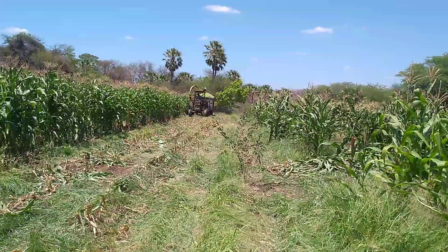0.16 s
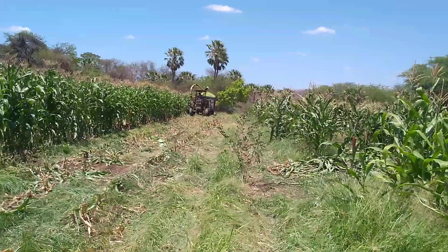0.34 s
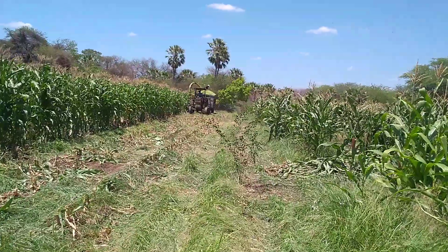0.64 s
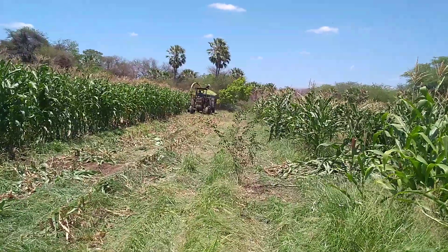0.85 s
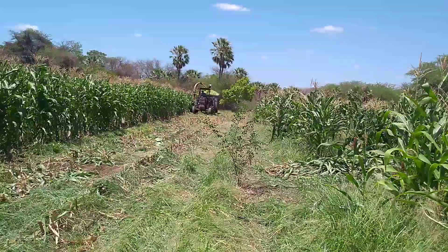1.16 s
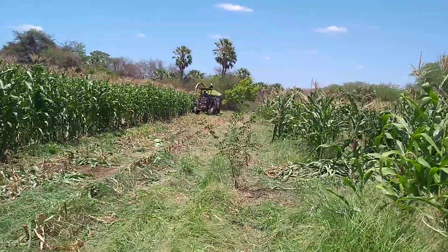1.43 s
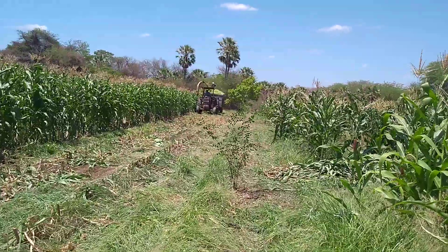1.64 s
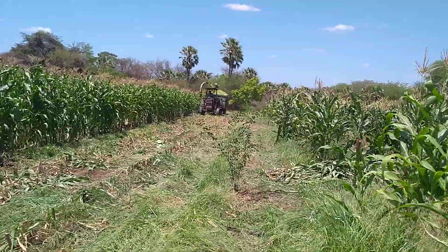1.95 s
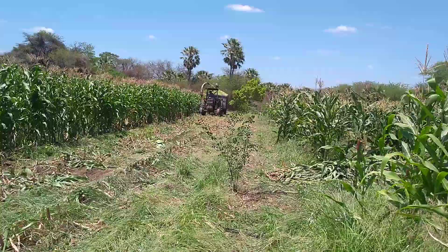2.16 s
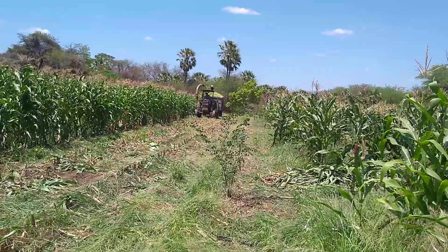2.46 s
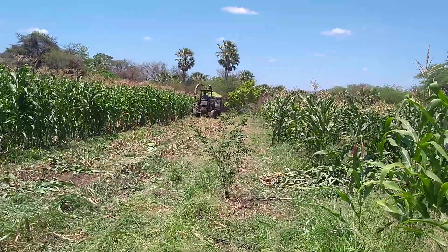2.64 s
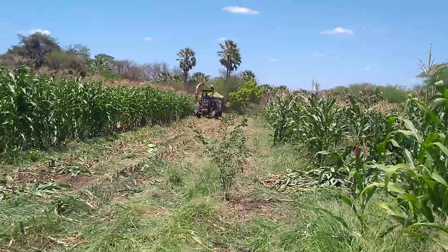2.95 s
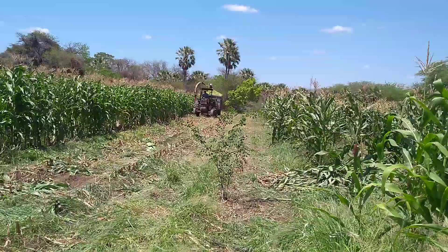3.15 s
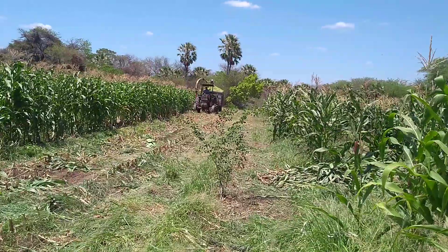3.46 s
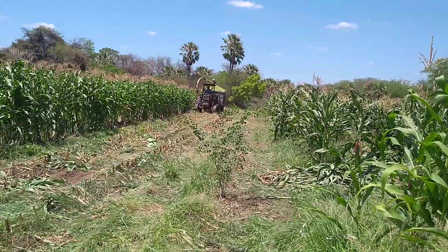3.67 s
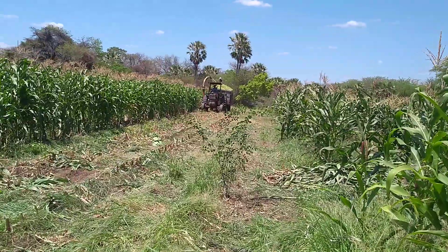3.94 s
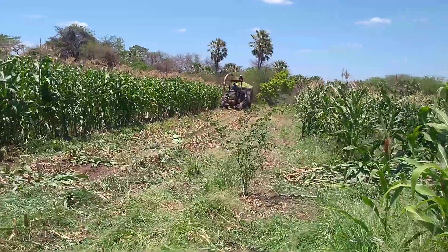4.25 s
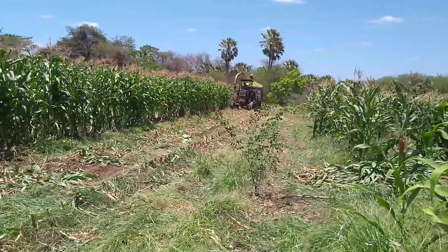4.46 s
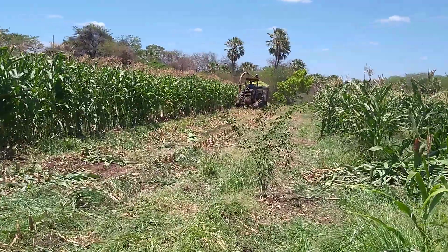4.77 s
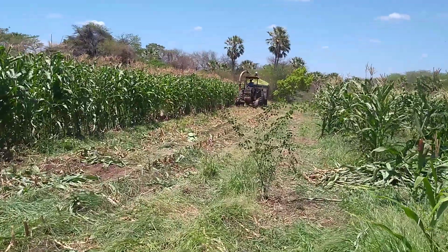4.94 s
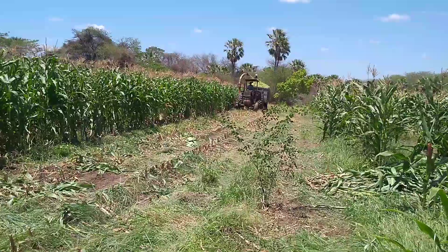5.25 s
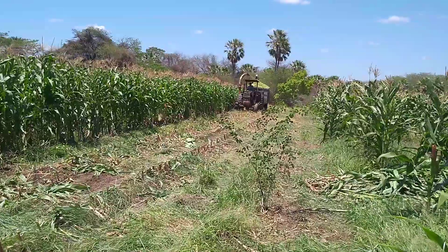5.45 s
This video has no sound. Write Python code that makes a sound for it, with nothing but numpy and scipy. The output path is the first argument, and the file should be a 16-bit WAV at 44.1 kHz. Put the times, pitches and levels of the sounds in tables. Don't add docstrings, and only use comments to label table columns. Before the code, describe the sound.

A tractor hauls a forage harvester through maize.

```python
import sys
import numpy as np
from scipy import signal
from scipy.fft import rfft, irfft, next_fast_len
from scipy.io import wavfile
from scipy.ndimage import uniform_filter1d

SR = 44100
rng = np.random.default_rng(int(sys.argv[2]) if len(sys.argv) > 2 else 0)


def to_wav(s):
    ch = np.atleast_2d(s).T
    pcm = np.round(np.clip(ch, -1, 1) * 32767)
    wavfile.write(sys.argv[1], SR, pcm.astype(np.int16))


def linear_from_db(decibels):
    return 10 ** (np.asarray(decibels, float) / 20)


N = 246959

# t/s, firing rate/Hz
FIRING_RATE = [(0.0, 65.28), (0.8, 63.71), (1.2, 65.98), (1.6, 65.74), (2.0, 64.72), (2.4, 65.5),
               (2.8, 65.77), (3.2, 66.29), (3.6, 66.39), (4.0, 66.45), (4.4, 67.36), (4.8, 68.26),
               (5.2, 68.91), (5.6, 69.63)]
# knock level/dB, lateness/ms, valve level/dB
CYLINDER_SPREAD = [(0, 0, 1), (-4, 2.5, -3), (-4, 0, 1.5), (2, 0, 1.5)]
# t/s, extra level/dB
HARD_FIRINGS = [
    (.708, 4.5),
    (1.066, 11),
    (2.257, 4),
    (2.501, 3),
    (4.011, 2.5),
    (5.076, 3),
    (5.5, 6),
]
# multiple of firing rate, level/dB
EXHAUST_LINES = [(1.0, 0.5), (1.25, -26), (1.5, -24.0), (1.75, -13), (2.0, -2.5), (2.25, -7.5), (2.5, -32),
                 (2.75, -20), (3.0, -6), (3.25, -12), (3.75, -8.5), (4.25, -15), (4.5, -36), (4.75, -43),
                 (5.0, -17), (5.25, -19.5), (5.75, -19.5), (6.0, -15.5), (6.25, -47), (6.75, -17),
                 (7.0, -24), (7.75, -48)]
# multiple of knife rate, level re hum/dB
KNIFE_LINES = [(1, 0.5), (2, -16.5), (4, -33.5), (1.398, -38), (2.514, -18)]
# t/s, level/dB
CROP_BITE = [(0, -17), (.8, -14), (1.4, -7), (2.6, -5), (3.2, -1.5), (4.0, -3.5), (4.8, 0.5), (5.6, 1.5)]
# f/Hz, level/dB
ROAR_SPECTRUM = [(30, -25), (60, -11), (100, -20), (140, 5), (250, 1), (400, -6.5), (520, -6), (700, -48)]
# f/Hz, level/dB
KNOCK_SPECTRUM = [(350, -41.5), (500, 1), (800, -2), (1200, -4.5), (1500, -13), (1900, -17.5), (2600, -54)]
# f/Hz, width/Hz, level/dB
BLOCK_MODES = [(630, 43, 2.5), (732, 82, 8.5), (814.4, 10, -5), (1114, 18, -11.5), (1240, 51, -8)]
# f/Hz, level/dB
CLATTER_SPECTRUM = [(900, -7), (1400, 11), (1900, 9), (2300, 4.5), (3300, 1), (4600, -3.5), (5500, -10.5),
                    (8000, -15.5), (11000, -17.5), (14200, -19)]
# f/Hz, level/dB
LEAF_SPECTRUM = [(2500, -37), (4500, -7.5), (6000, -1), (9000, -4.5), (12000, -8.5), (13400, -11),
                 (14200, -6.5)]
# t/s, first notch f/Hz
GROUND_NOTCH = [(0, 656), (1, 696), (2, 606), (2.8, 630), (3.3, 562), (4, 520), (4.6, 525), (5.1, 582),
                (5.6, 554)]
# multiple of first notch f, level/dB
BOUNCE_SHAPE = [(.6, 6.5), (1, -6), (1.3, 6), (2, 4), (2.3, -8), (2.7, -3.5), (3.6, -4), (5, -2)]
# t/s, level/dB
NEARNESS = [(0, -6), (.65, -5), (1.04, -7.5), (1.5, -4), (1.85, -2), (2.23, -2.5), (2.6, 0), (3.0, 1),
            (3.35, .8), (3.7, -0.7), (4.15, -1.5), (4.6, -0.6), (5.0, 0), (5.6, -.5)]
# f/Hz, level/dB
WIND_SPECTRUM = [(15, -27), (40, -3.5), (90, 2.5), (200, -1.5), (400, -16), (800, -45), (1500, -100)]
# peak t/s, peak level/dB, length/s
WIND_GUSTS = [
    (0.047, -45, 0.045),
    (0.172, -34, 0.097),
    (0.336, -39, 0.074),
    (0.704, -29.5, 0.08),
    (0.833, -37, 0.032),
    (1.145, -40, 0.39),
    (2.694, -50, 0.1),
    (3.015, -38, 0.05),
]
# t/s, thud level/dB, thud f/Hz, snap level/dB, way (-1 in, 1 out)
CASE_TICKS = [(.0578, -28, 280, -40, 1), (.0598, -26, 480, -50, -1), (.063, -21, 230, -25, -1),
              (.0665, -27, 420, -50, -1), (.0703, -12, 360, -30, -1), (.178, -24, 160, -70, 1),
              (.678, -27, 110, -70, 1), (.7275, -19.5, 220, -33, 1), (2.4062, -30, 500, -25, -1),
              (2.4619, -18, 300, -17.5, -1), (2.946, -32, 300, -33, -1), (2.977, -26, 250, -32, -1),
              (5.5315, -20, 220, -36, -1)]
# f/Hz, share fed across
CROSS_FEED = [(2200, 0.81), (4600, 0.63), (7000, 0.31), (11000, 0.06), (14000, 0.17)]
# f/Hz, level re sum/dB, lead/rad
PORT_BASS = [(40, -4.2, 1.98), (86, -4.7, 1.95), (130, -9.4, 1.67), (300, -17, 1.29), (600, -22, .84),
             (800, -29, .68), (1000, -70, .6)]

# (level when near/dB, share of nearness followed)
EXHAUST_DB, ROAR_DB, KNOCK_DB, CLATTER_DB = (-36, 0.59), (-35, 0.98), (-39, 1.15), (-55, 0.4649)
HUM_DB, WHINE_DB = -35.5, -41.5
KNIVES_PER_FIRING, GRIP_T_S, GRIP_GAIN = 1.8124, (4, 4.4), 0.0069
SWELL_T_S, SWELL_WIDTH_S, SWELL_DB = 2.97, 0.13, 2.5
SAG_DB, SAG_T_S, SAG_HALF_S = 10.5, 0.074, 0.26
GUST_EDGE_DB, GUST_RISE, CALM_DB = 10.5, 0.64, -54.5
PORT_DELAY_S, EDGE_HZ, SIDE_HZ = 0.0004412, 14250, (4050, 13600)


def evened(x):
    return x / np.sqrt(np.mean(x ** 2) + 1e-20)


def noise():
    return rng.standard_normal(N)


def read(points, hz):
    f, value = np.transpose(points)
    return np.interp(np.log(hz + 1), np.log(f + 1), value)


def curve(rows):
    s, value = np.transpose(rows)
    return np.interp(np.arange(N) / SR, s, value)


def colour(x, points):
    level_db = np.maximum(read(points, np.fft.rfftfreq(8192, 1 / SR)), -100)
    half = np.log(linear_from_db(level_db))
    whole = np.r_[half, half[-2:0:-1]]
    taps = np.fft.ifft(np.exp(np.conj(signal.hilbert(whole)))).real[:4096]
    return evened(signal.oaconvolve(x, taps)[:N])


def drift(hz):
    return evened(signal.lfilter(*signal.butter(2, hz / (SR / 2)), noise()))


def carried(layer):
    level_db, share = layer
    since_s = np.arange(N) / SR - SAG_T_S
    onset = np.clip(since_s / 0.018, 0, 1)
    sag_db = SAG_DB * onset * 2 ** (-np.maximum(since_s, 0) / SAG_HALF_S)
    return linear_from_db(level_db + share * (curve(NEARNESS) - sag_db))


def lines(table, turns, waver_db, lag_rad=0):
    total = np.zeros(N)
    for multiple, db in table:
        level = linear_from_db(db + waver_db * drift(16)) * np.sqrt(2)
        phase = 2 * np.pi * multiple * turns - lag_rad * min(multiple - 1, 1)
        phase = phase + 0.3 * drift(2.2) + 2.95 * (multiple % 1 == 1 / 4)
        total += level * np.cos(phase)
    return total


def exhaust(turns):
    return carried(EXHAUST_DB) * lines(EXHAUST_LINES, turns, 0.5, lag_rad=1.51)


def knife_wheel(rate_hz):
    grip = np.interp(np.arange(N) / SR, GRIP_T_S, (0, GRIP_GAIN))
    passes = np.cumsum(rate_hz * (KNIVES_PER_FIRING + grip)) / SR + 0.21
    bite_db = curve(CROP_BITE)
    hum = linear_from_db(HUM_DB + bite_db) * lines(KNIFE_LINES, passes, 1.8)
    whine = linear_from_db(WHINE_DB + bite_db) * lines([(3, 0)], passes, 1.2, lag_rad=3.0)
    return hum + whine


def firings(turns, column, spread_db, hard=()):
    at = np.flatnonzero(np.diff(np.floor(turns)) > 0)
    cylinder = np.transpose(CYLINDER_SPREAD)[:, np.floor(turns[at + 1]).astype(int) % 4]
    luck = rng.standard_normal((len(at), 2))
    size_db = cylinder[column] + spread_db * luck[:, 0]
    for s, db in hard:
        size_db[np.argmin(abs(at / SR - s))] += db
    late_ms = cylinder[1] + 0.21 * luck[:, 1]
    place = at + late_ms * SR / 1000
    clicks = np.zeros(N)
    clicks[np.clip(place.astype(int), 0, N - 1)] = linear_from_db(size_db)
    return clicks


def puffs(clicks, decay_s, steady):
    t = np.arange(2000) / SR
    swell = evened(signal.oaconvolve(clicks, t * np.exp(-t / decay_s))[:N])
    return (steady + swell) * noise()


def ground(x, patchy_db):
    hz, t, z = signal.stft(x, SR, nperseg=512, noverlap=384)
    notch_hz = np.interp(t, *np.transpose(GROUND_NOTCH))
    carved_db = np.interp(hz[:, None] / notch_hz, *np.transpose(BOUNCE_SHAPE))
    patches = uniform_filter1d(rng.standard_normal(z.shape), size=2, axis=0)
    patches = evened(uniform_filter1d(patches, size=9, axis=1))
    z = z * linear_from_db(carved_db + patchy_db * patches)
    return evened(signal.istft(z, SR, nperseg=512, noverlap=384)[1][:N])


def gas_roar(blows):
    return carried(ROAR_DB) * ground(colour(puffs(blows, 0.0039, 3.0), ROAR_SPECTRUM), 1.3)


def block_ring(blows):
    t = np.arange(1500) / SR
    body = np.zeros(len(t))
    for hz, width_hz, db in BLOCK_MODES:
        body += linear_from_db(db) * np.exp(-np.pi * width_hz * t) * np.sin(2 * np.pi * hz * t)
    return evened(signal.oaconvolve(blows, body)[:N])


def cylinder_knock(blows):
    shocks = 0.35 * evened(blows) + evened(puffs(blows, 0.0028, 1.2))
    knock = colour(shocks, KNOCK_SPECTRUM) + 0.75 * block_ring(blows)
    return carried(KNOCK_DB) * ground(knock, 1.38)


def clatter(turns):
    valves = firings(turns - 0.03, 2, 4.7)
    hit_level = linear_from_db(3.8 * np.minimum(rng.exponential(1, N), 4))
    hit_now = rng.random(N) < 900 / SR
    chain = hit_level * hit_now * rng.choice([-1, 1], N)
    metal = colour(evened(puffs(valves, 0.0013, 4.5)) + 0.22 * evened(chain), CLATTER_SPECTRUM)
    leaves = linear_from_db(-11) * colour(noise(), LEAF_SPECTRUM)
    offset = (np.arange(N) / SR - SWELL_T_S) / SWELL_WIDTH_S
    swell_gain = linear_from_db(SWELL_DB * np.exp(-offset ** 2))
    return carried(CLATTER_DB) * swell_gain * (ground(metal, 2.1) + leaves)


def tractor():
    rate_hz = curve(FIRING_RATE)
    turns = np.cumsum(rate_hz) / SR + 0.28
    blows = firings(turns + 0.2, 0, 1.1, HARD_FIRINGS)
    low = exhaust(turns) + knife_wheel(rate_hz) + gas_roar(blows) + cylinder_knock(blows)
    return low, clatter(turns)


def wind():
    t = np.arange(N) / SR
    level = np.full(N, linear_from_db(CALM_DB))
    for s, db, length_s in WIND_GUSTS:
        away = np.maximum((t - s) / length_s, (s - t) / (GUST_RISE * length_s))
        level += linear_from_db(db - GUST_EDGE_DB * away)
    return level * colour(noise() * linear_from_db(1.5 * drift(17)), WIND_SPECTRUM)


def add(mix, s, sound):
    part = mix[round(s * SR):][:len(sound)]
    part += sound[:len(part)]


def ticks():
    out, t = np.zeros(N), np.arange(-600, 1200) / SR
    for s, db, hz, snap_db, way in CASE_TICKS:
        swing = np.cos(2 * np.pi * hz * t) * np.exp(-((t * hz / 0.5) ** 2 + 0.01) ** 0.8)
        rebound = np.sin(2 * np.pi * 70 * (t - 0.006)) * np.exp(-((t - 0.008) / 0.0082) ** 2)
        snap = np.exp(-np.hypot(t + 0.001, 0.00002) / 0.00013)
        snap += 0.035 * rng.standard_normal(len(t)) * np.exp(-abs(t) / 0.0003)
        add(out, s + t[0], way * linear_from_db(db) * (swing + 0.15 * rebound / linear_from_db(0)) + linear_from_db(snap_db) * snap)
    return out


def scene():
    low, high = tractor()
    low = low + wind() + ticks()
    scattered = colour(noise(), LEAF_SPECTRUM) * carried(CLATTER_DB) * linear_from_db(-18)
    return np.array([low + high + scattered, low + high - scattered])


def band_limit(x):
    return signal.sosfilt(signal.butter(12, 14530, fs=SR, output="sos"), x)


def record(dry):
    size = next_fast_len(N + 4096)
    hz = np.fft.rfftfreq(size, 1 / SR)
    left, right = rfft(np.pad(dry, ((0, 0), (0, size - N)), "reflect"))
    both, apart = (left + right) / 2, (left - right) / 2
    feed = read(CROSS_FEED, hz) * np.exp(-2j * np.pi * hz * PORT_DELAY_S)
    bass_restore = 1 - feed / (1 + (hz / 1300) ** 4)
    mid = both * (1 - feed) / bass_restore * (hz < EDGE_HZ)
    port_hz, port_db, lead_rad = np.transpose(PORT_BASS)
    side = mid * linear_from_db(read(np.c_[port_hz, port_db], hz))
    side *= np.exp(1j * read(np.c_[port_hz, lead_rad], hz))
    late = 0.29 * both * np.exp(-2j * np.pi * (hz - 6300) / 2400)
    side += (late + apart) * (hz > SIDE_HZ[0]) * (hz < SIDE_HZ[1])
    mix = irfft(np.array([mid + side, mid - side]), size)[:, :N]
    return band_limit(mix)


dry = scene()
out = record(dry)
to_wav(out)
```